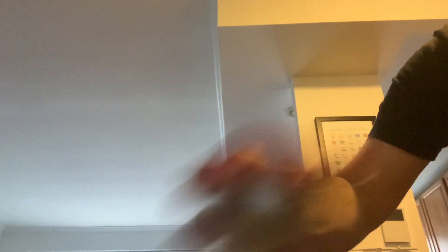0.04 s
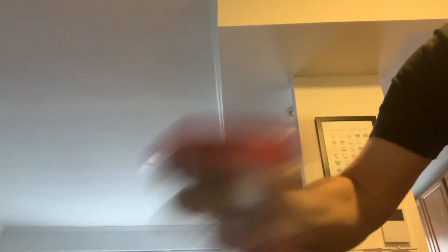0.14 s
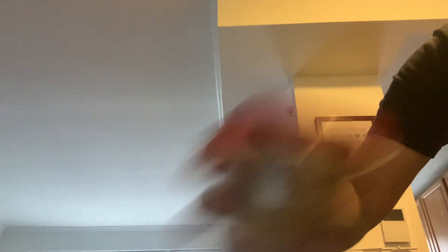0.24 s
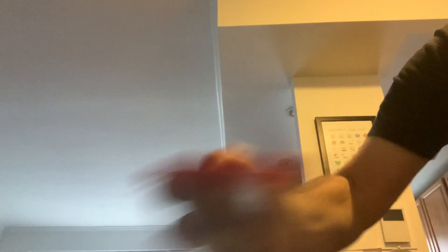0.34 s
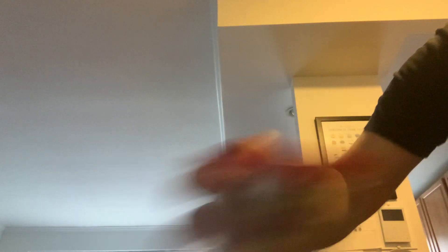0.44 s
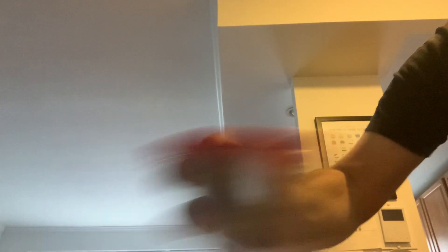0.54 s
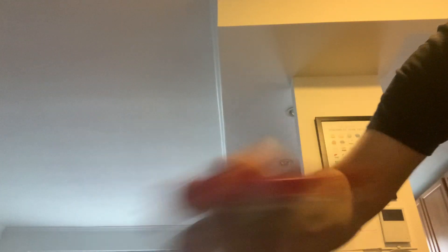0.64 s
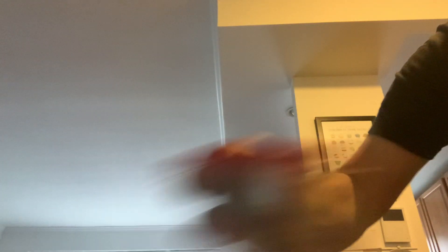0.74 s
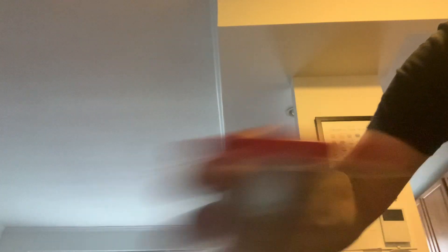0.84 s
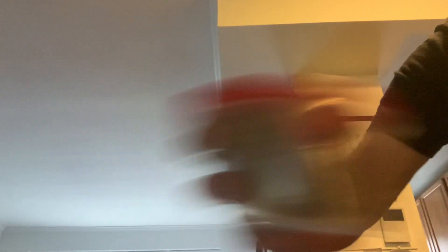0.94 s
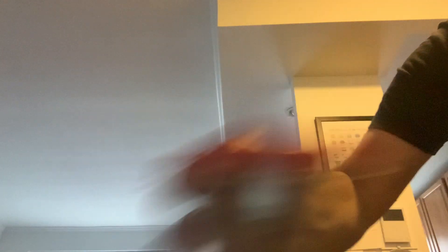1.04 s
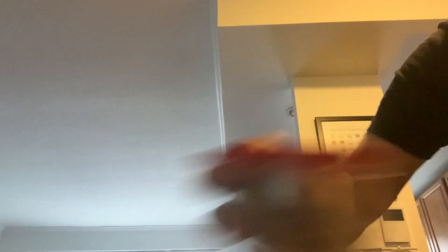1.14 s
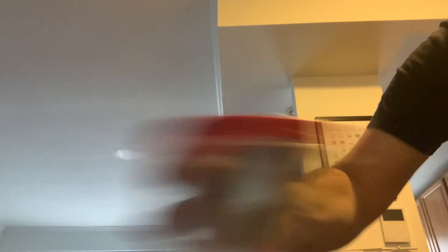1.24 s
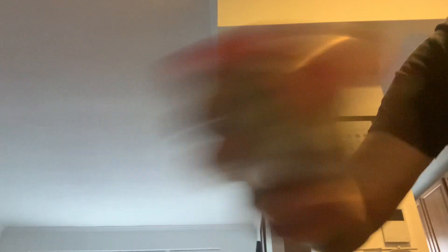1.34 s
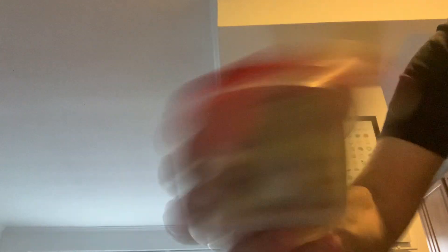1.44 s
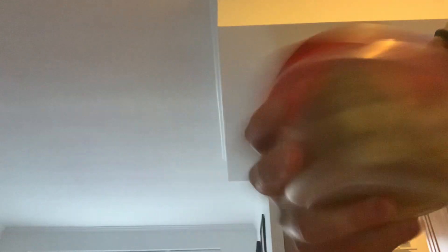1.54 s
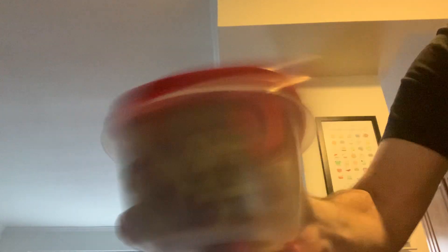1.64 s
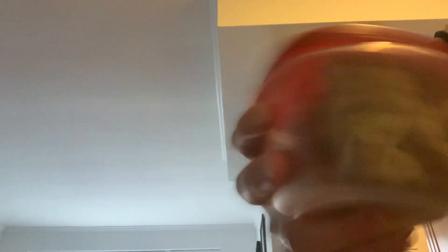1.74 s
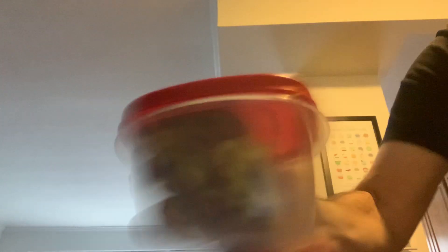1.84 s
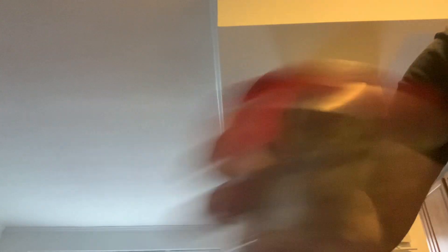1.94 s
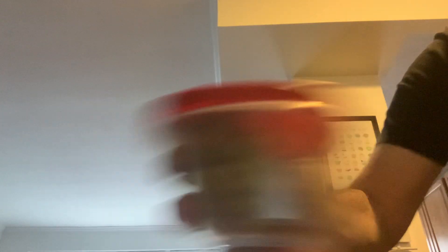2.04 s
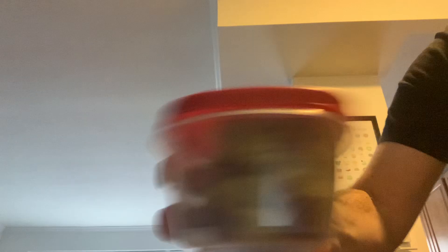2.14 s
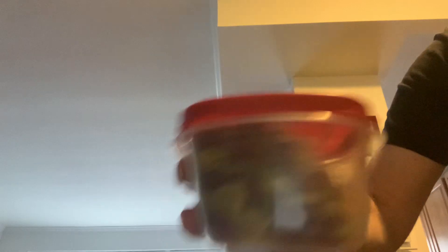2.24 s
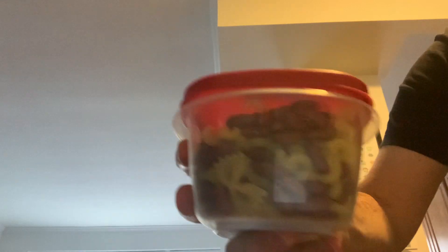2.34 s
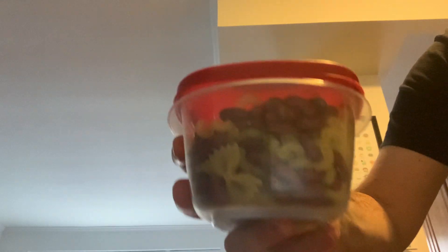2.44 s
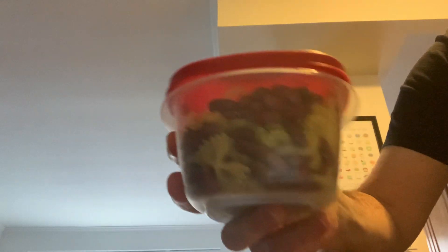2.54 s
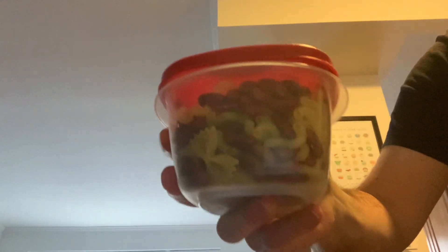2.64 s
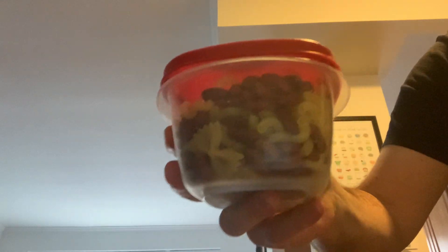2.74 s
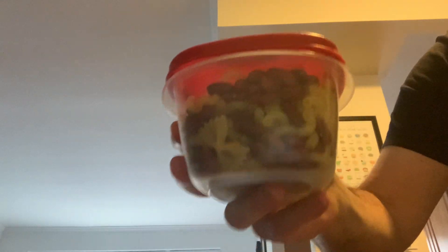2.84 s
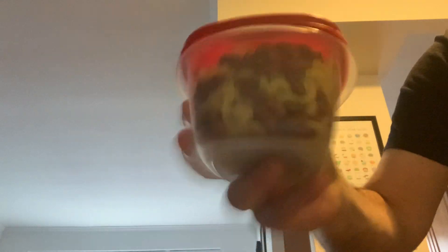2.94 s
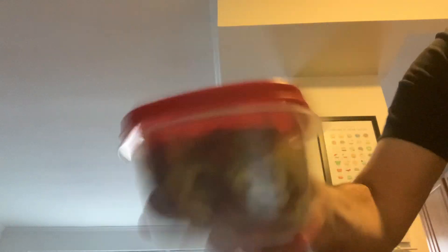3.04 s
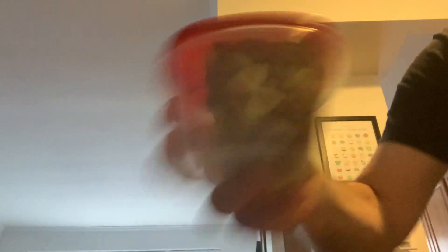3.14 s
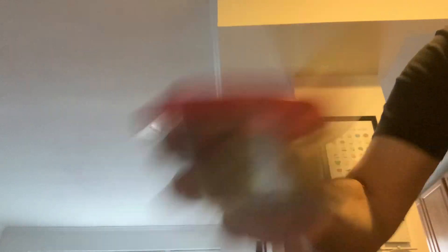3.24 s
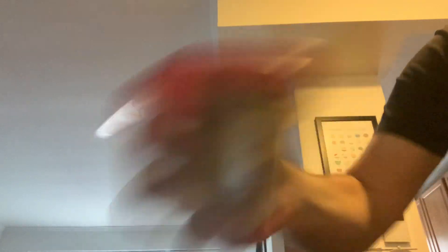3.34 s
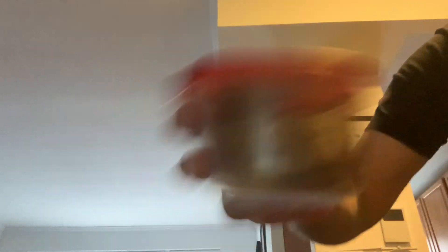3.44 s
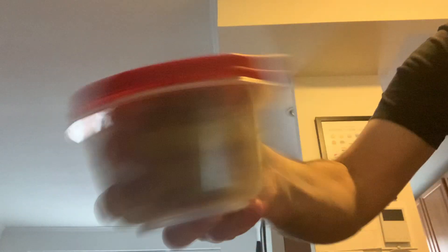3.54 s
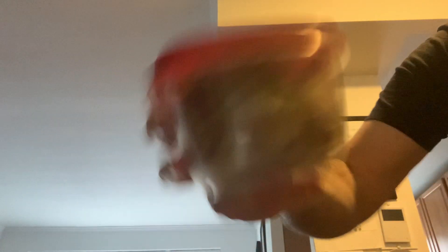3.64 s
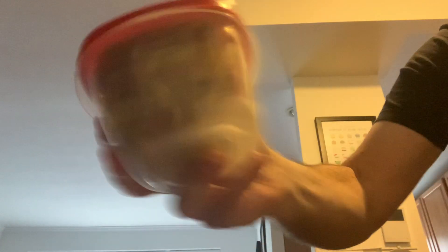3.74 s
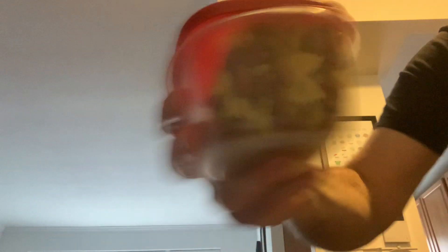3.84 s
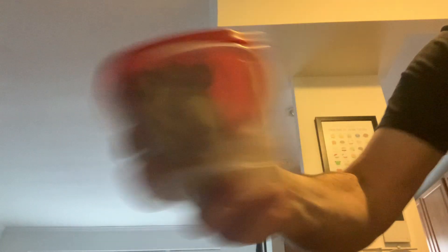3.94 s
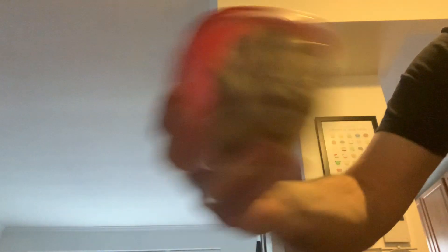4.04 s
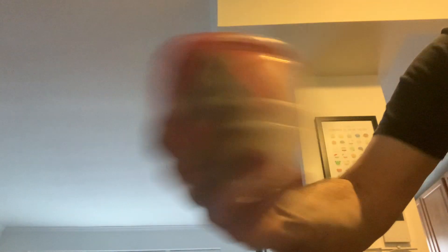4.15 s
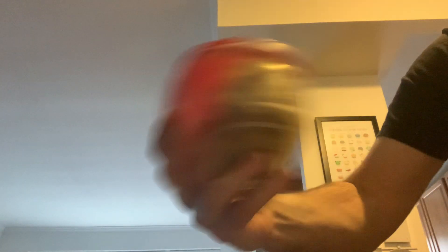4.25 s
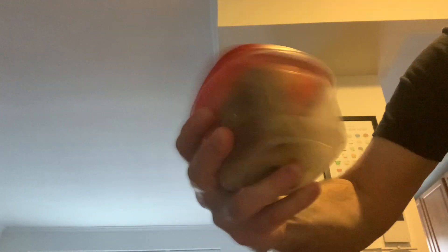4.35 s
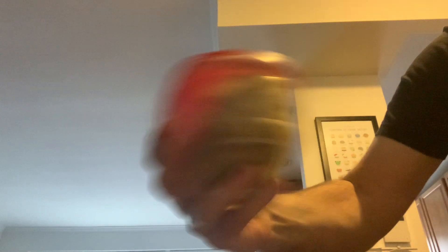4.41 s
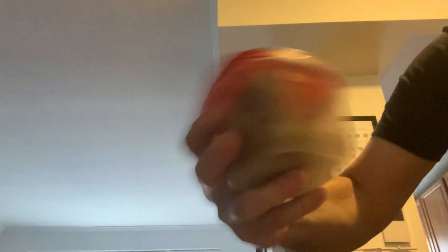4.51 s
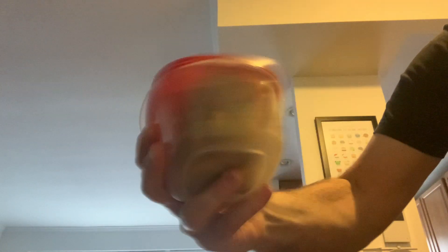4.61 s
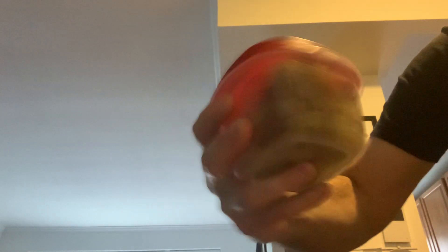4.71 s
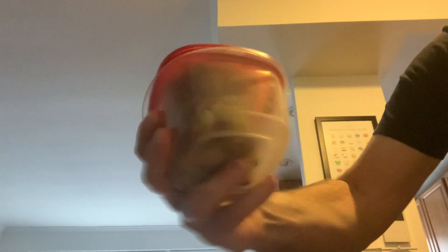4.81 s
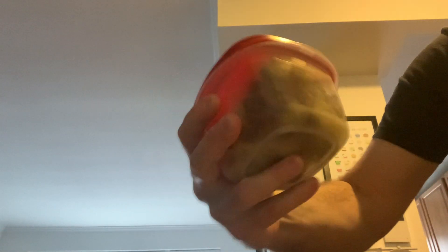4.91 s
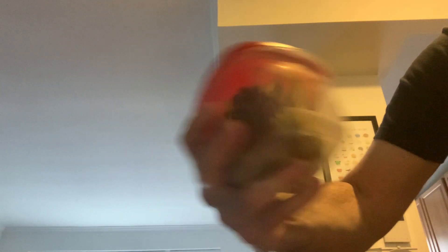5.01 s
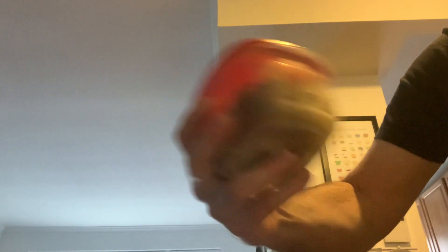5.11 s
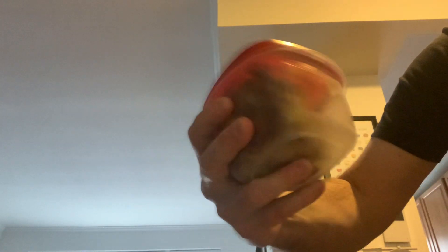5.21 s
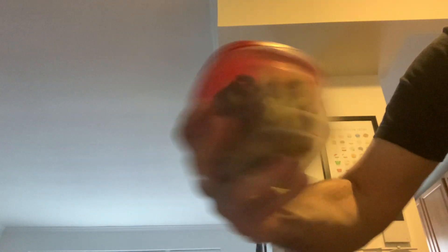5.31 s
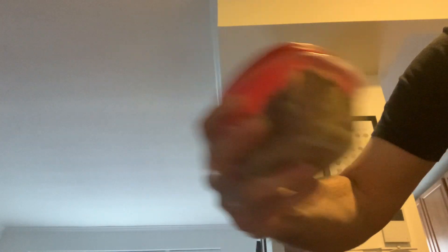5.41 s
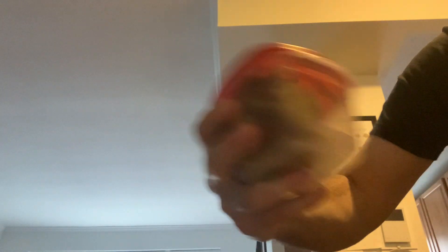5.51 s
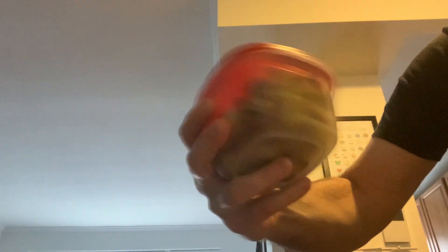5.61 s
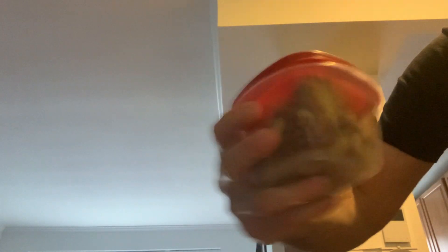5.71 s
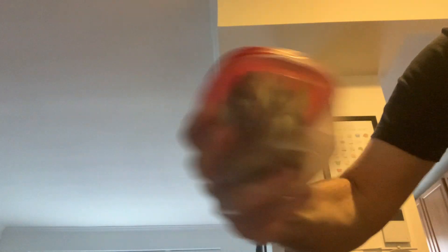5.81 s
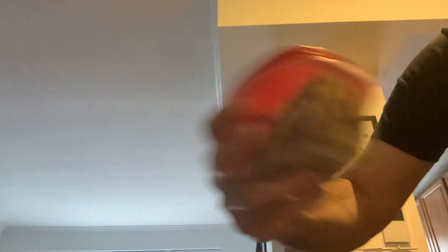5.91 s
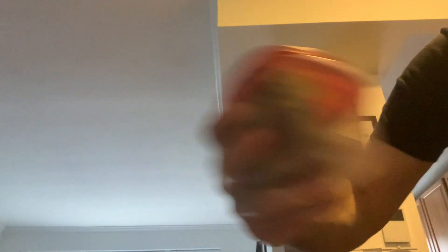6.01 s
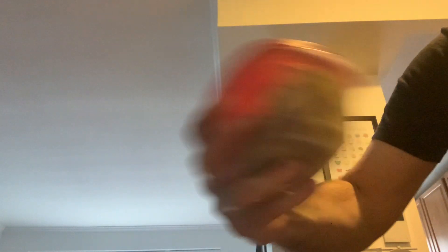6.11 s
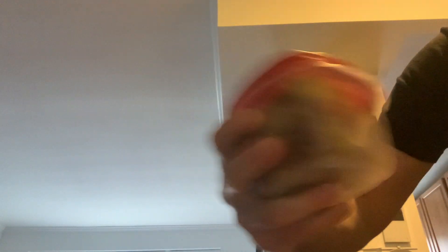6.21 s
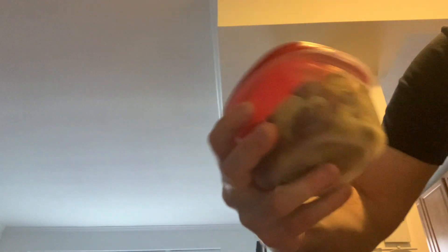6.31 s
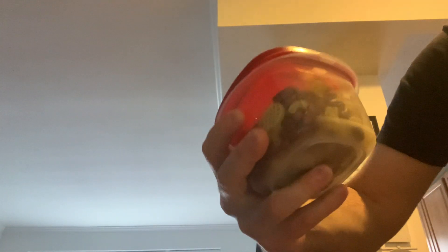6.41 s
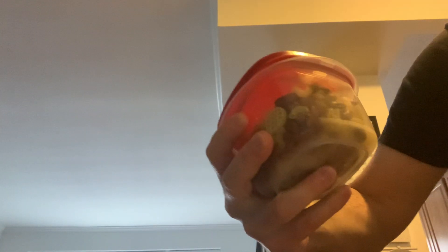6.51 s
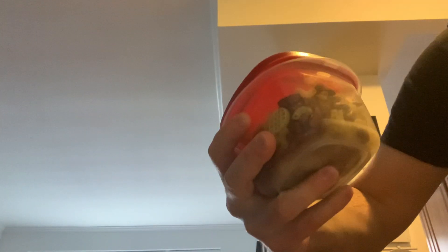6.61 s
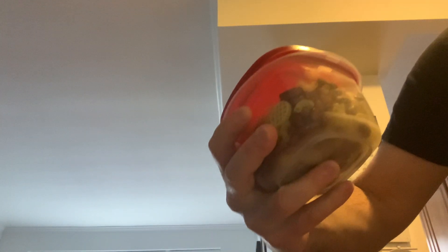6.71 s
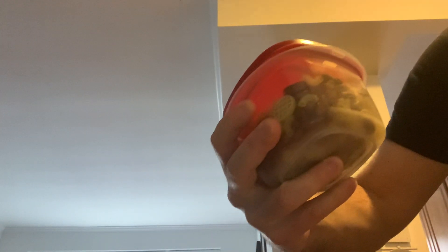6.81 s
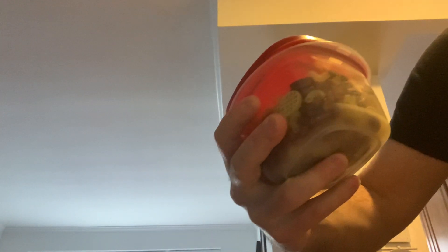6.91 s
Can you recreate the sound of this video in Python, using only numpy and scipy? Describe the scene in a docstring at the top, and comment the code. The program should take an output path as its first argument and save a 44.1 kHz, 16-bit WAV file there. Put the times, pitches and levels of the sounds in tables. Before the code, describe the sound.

Dry pasta and beans are shaken hard in a lidded plastic tub, close to the microphone in a small room. Each quick stroke makes a bright, crisp rattle with a hollow plastic thud beneath it. The shaking stops briefly while a few pieces settle, then resumes for a longer bout. At the end the last pieces tick into place over quiet room tone.

```python
"""Shaking a tub of dry pasta and beans

A lidded plastic tub is shaken hard in two bouts, close by in a small room, and turned onto its side
during the second. About eleven times a second the load crashes into one end: first a bright shower of
loose pieces, a moment later the packed bulk, which thuds on the plastic and sounds the tub's hollow note.
Between strokes the pieces tumble; after each bout the last ones settle and the hand shifts its grip."""
import sys
import numpy as np
from scipy import signal
from scipy.fft import rfft, irfft, next_fast_len
from scipy.io import wavfile
from scipy.ndimage import uniform_filter1d, map_coordinates

SR = 44100
rng = np.random.default_rng(int(sys.argv[2]) if len(sys.argv) > 2 else 0)


def log_audio(samples):
    """Write samples as a 16-bit WAV file to the path given in sys.argv[1]."""
    # one column per channel
    frames = np.atleast_2d(samples).T
    # limit to full scale, then quantise
    limited = np.clip(frames, -1, 1)
    pcm = np.round(limited * 32767).astype(np.int16)
    wavfile.write(sys.argv[1], SR, pcm)


N = 307199
TIME = np.arange(N) / SR

# The load hits an end of the tub, each layer on its own level scale:
# t/s, shower level/dB, rise to its crest/s, bulk lag after the crest/s, thud level/dB, note level/dB
STROKES = [(0.053, -17.5, 0.018, 0.0078, -30.5, -36), (0.15, -18.5, 0.036, 0.0093, -27, -29.5),
           (0.27, -15, 0.0045, 0.015, -27, -43), (0.37, -14.5, 0.014, 0.017, -25.5, -40.5),
           (0.473, -12, 0.015, 0.0054, -26, -33), (0.562, -17, 0.018, 0.012, -25.5, -26.5),
           (0.658, -16, 0.021, 0.01, -24, -48), (0.755, -14.5, 0.013, 0.013, -27.5, -27.5),
           (0.864, -14.5, 0.0033, 0.016, -27.5, -50), (0.946, -17, 0.03, 0.0034, -25.5, -29.5),
           (1.051, -16.5, 0.013, 0.015, -26, -42.5), (1.143, -17.0, 0.031, 0.0096, -25, -32.5),
           (1.253, -14, 0.015, 0.001, -25.5, -41), (1.349, -14.5, 0.013, 0.014, -29, -25),
           (1.439, -16, 0.021, 0.012, -25.5, -48), (1.531, -13.5, 0.012, 0.01, -45, -30),
           (1.626, -15, 0.0091, 0.012, -25.5, -37), (1.713, -13.5, 0.0095, 0.015, -33, -31.5),
           (1.81, -14, 0.0074, 0.012, -25, -41.5), (1.896, -12.5, 0.0075, 0.01, -33.5, -31.5),
           (1.984, -15.0, 0.013, 0.0047, -23.5, -42), (2.064, -15.5, 0.012, 0.011, -38, -28.5),
           (2.155, -17.5, 0.016, 0.005, -25.5, -34), (2.25, -17.5, 0.02, 0.001, -43, -34),
           (3.035, -21.5, 0.011, 0.0068, -20, -27.5), (3.089, -13, 0.012, 0.006, -30.5, -35),
           (3.195, -17, 0.0053, 0.008, -18.5, -49), (3.264, -15, 0.0077, 0.012, -46, -38),
           (3.355, -19.5, 0.029, 0.001, -22, -41), (3.443, -15.5, 0.01, 0.016, -38, -25.5),
           (3.523, -15.5, 0.018, 0.011, -24.5, -30), (3.625, -15.0, 0.014, 0.012, -33.5, -29.5),
           (3.713, -14.5, 0.015, 0.02, -29.5, -29), (3.804, -16.5, 0.023, 0.014, -31, -48),
           (3.887, -13.5, 0.016, 0.015, -40, -27.5), (3.986, -14.5, 0.0031, 0.013, -41.5, -32),
           (4.07, -15.5, 0.023, 0.0065, -30.5, -33), (4.173, -14.5, 0.0089, 0.0038, -44, -46.5),
           (4.256, -15.0, 0.021, 0.016, -45, -31.5), (4.351, -13.5, 0.011, 0.0022, -34, -51),
           (4.426, -16.5, 0.03, 0.0033, -40, -36), (4.514, -15.5, 0.017, 0.0065, -33.5, -50),
           (4.596, -14.5, 0.019, 0.013, -34, -29), (4.691, -13, 0.0063, 0.003, -41, -44),
           (4.778, -14, 0.014, 0.011, -37, -29), (4.873, -16, 0.011, 0.0075, -31, -44),
           (4.974, -19.5, 0.017, 0.012, -47, -43), (5.064, -23, 0.025, 0.001, -39, -37),
           (5.146, -21.5, 0.012, 0.001, -37, -52), (5.244, -24.5, 0.007, 0.001, -30.5, -40),
           (5.306, -16, 0.013, 0.014, -34, -62), (5.389, -21.5, 0.019, 0.002, -29, -35),
           (5.456, -17, 0.019, 0.0057, -38, -49), (5.54, -19.0, 0.032, 0.0018, -27.5, -31),
           (5.612, -16.5, 0.03, 0.01, -43, -51), (5.71, -18, 0.019, 0.001, -24.5, -34),
           (5.78, -15.5, 0.016, 0.014, -39, -30), (5.869, -16.5, 0.026, 0.001, -28.5, -53),
           (5.944, -16.0, 0.028, 0.013, -34, -27), (6.043, -15.5, 0.011, 0.011, -30.5, -47),
           (6.122, -16, 0.024, 0.0063, -33, -31.5), (6.223, -12.5, 0.0062, 0.008, -29, -40),
           (6.288, -20, 0.038, 0.011, -48, -44)]
# The turn of the tub: t/s, tilt (0 upright, 1 on its side)
TILT = [(0, 0), (3.6, 0), (4.3, 1)]


def amp(db):
    """Decibels to gain."""
    return 10 ** (np.asarray(db) / 20)


def unit(x):
    """Scaled to rms 1."""
    return x / np.sqrt(np.mean(x ** 2) + 1e-20)


def along(points, hz):
    """Rows of (f/Hz, value) read on a log frequency axis."""
    f, v = np.transpose(points)
    return np.interp(np.log(hz + 1), np.log(f), v)


def curve(rows):
    """One value per sample from rows of (t/s, value)."""
    return np.interp(TIME, *np.transpose(rows))


def coloured(x, spectrum, size=4096):
    """x through a minimum-phase filter of unit energy with the given colour."""
    cepstrum = irfft(np.log(amp(along(spectrum, np.fft.rfftfreq(size, 1 / SR)))))
    cepstrum[1:size // 2] *= 2
    cepstrum[size // 2 + 1:] = 0
    response = irfft(np.exp(rfft(cepstrum)))
    return signal.oaconvolve(x, response / np.linalg.norm(response))[:N]


def swell(crest, rise, fall):
    """The samples that a swell spans, and its bell-shaped envelope there."""
    span = slice(max(0, int((crest - 4 * rise) * SR)), int((crest + 4 * fall) * SR))
    t = TIME[span] - crest
    return span, np.exp(-.5 * (t / np.where(t < 0, rise, fall)) ** 2)


def swells(times, db, rise, fall):
    """Envelope of a series of swells, added in power."""
    power = np.zeros(N)
    for crest, peak, up, down in np.broadcast(times, amp(db), rise, fall):
        span, shape = swell(crest, up, down)
        power[span] += (peak * shape) ** 2
    return np.sqrt(power)


def contacts(rate, scatter_db):
    """Random impacts of uneven size, rate a second, with mean power 1."""
    chance = np.clip(rate / SR, 1e-4, 1)
    sizes = unit(amp(scatter_db * np.clip(rng.standard_normal(N), -2, 2)))
    return (rng.random(N) < chance) * rng.choice([-1, 1], N) * sizes / np.sqrt(chance)


def pieces(hits, t60, count=3, ring_size=512, block_size=2048):
    """Each impact is a sharp tick plus the brief ring of a piece; every block brings new pieces."""
    t = np.arange(ring_size) / SR
    blocks = np.pad(hits, (0, -N % block_size)).reshape(-1, 1, block_size)
    rings = rng.standard_normal((len(blocks), count, ring_size)) * amp(-60 * t / t60)
    rings[..., 0] = 0.82 * np.linalg.norm(rings, axis=2)  # the tick
    rings /= np.linalg.norm(rings, axis=2, keepdims=True)
    struck = rng.integers(count, size=blocks.shape) == np.arange(count)[:, None]  # one piece per hit
    rung = signal.fftconvolve(blocks * struck, rings, axes=2).sum(axis=1)
    positions = block_size * np.arange(len(rung))[:, None] + np.arange(rung.shape[1])
    return np.bincount(positions.ravel(), rung.ravel())[:N]  # overlap-add


def background(hum_hz, hum_db, air_db):
    """Room tone: quiet air and a low, wavering hum."""
    # Colour of the room air: f/Hz, level/dB
    air_colour = [(25, .5), (58, -3), (100, -4), (200, -2), (450, -3.5), (700, -20), (3000, -30),
                  (5400, -23.5), (9500, -19), (15500, -46)]
    waver = 0.014 * np.cumsum(rng.standard_normal(N))
    hum = amp(hum_db) * np.sin(2 * np.pi * hum_hz * TIME + waver)
    return hum + amp(air_db) * coloured(rng.standard_normal(N), air_colour)


def tumble():
    """Loose pieces slide and knock between strokes, hushed in flight, thinning as the tub comes to rest."""
    # Flow of loose pieces through both bouts: t/s, level/dB
    flow_levels = [(0, -26), (1.3, -29), (2.25, -28), (2.38, -33.5), (2.48, -50), (2.68, -79),
                   (3.005, -72.5), (3.035, -27.5), (3.9, -27.5), (5.1, -30), (6.35, -27), (6.41, -41.5),
                   (6.53, -42.5), (6.61, -56), (6.72, -54), (6.82, -64)]
    # Colour of sliding pieces: f/Hz, level/dB
    slide_colour = [(100, -34.5), (220, -16), (360, 0.9), (600, -6.5), (950, -10), (1350, -3.5), (2000, -5),
                    (2700, -1), (4400, -7), (6000, -7.5), (8500, -5.5), (10200, -5), (12500, -14.5),
                    (15800, -34)]
    onsets, *_ = np.transpose(STROKES)
    airborne = swells(onsets - .014, db=0, rise=.013, fall=.013)  # just before each landing
    flow = amp(curve(flow_levels) - 3 * airborne)
    hits = flow * contacts(600 + 130000 * flow, scatter_db=3.0)
    slide = coloured(pieces(hits, t60=.01), slide_colour)
    # slow pieces touch softly and sound duller
    soft = signal.sosfiltfilt(signal.butter(1, 4500, fs=SR, output="sos"), slide)
    hardness = flow / (flow + amp(-66))
    return soft + hardness * (slide - soft)


def showers(early_db=-3, front_s=0.002, fall_s=0.0093):
    """Envelope of the showers: a few early pieces, a sudden front, then a rise to the crest."""
    power = np.zeros(N)
    for onset, db, rise, *_ in STROKES:
        span, shape = swell(onset + rise, rise, fall_s)
        ahead = .5 - .5 * np.tanh((TIME[span] - onset) / front_s)
        power[span] += (amp(db + early_db * ahead) * shape) ** 2
    return np.sqrt(power)


def clumps(rate, depth_db):
    """Pieces arrive in clumps: a quick random gain of mean power 1, rate knots a second."""
    knots = rng.standard_normal(int(N * rate / SR) + 4)
    return unit(amp(depth_db * map_coordinates(knots, [TIME * rate], order=1)))


def wall_patches(x, depth_db, size=256):
    """The load lands on a new part of the wall each time, so broad resonances come and go."""
    spectra = signal.stft(x, nperseg=size)[2]
    patches = uniform_filter1d(rng.standard_normal(spectra.shape), size=7, axis=0)  # across frequency
    patches = uniform_filter1d(patches, size=16, axis=1)  # across time
    return signal.istft(spectra * unit(amp(depth_db * unit(patches))), nperseg=size)[1][:N]


def clatter(shower_treble_db=-1, bulk_treble_db=-0.1, sideways_treble_db=-0.05):
    """Two waves of contacts a stroke, denser when strong: a shower on the bare wall, then the bulk."""
    # Colour of pieces showering on the wall: f/Hz, level/dB
    clatter_colour = [(40, -67.5), (100, -50), (300, -21.5), (950, -12.5), (1350, -13), (2000, -9),
                      (2700, -1.5), (3400, -3), (4400, -7.5), (5000, -5.5), (5600, -7.5), (7400, -3),
                      (9000, -2.5), (10000, 2), (11300, -1.5), (12500, -9), (15800, -18.5)]
    onsets, shower_db, rise, lag, _, _ = np.transpose(STROKES)
    shower = showers()
    bulk = swells(onsets + rise + lag, shower_db - 5, rise=.0014, fall=.019)
    force = np.hypot(shower, bulk) * clumps(rate=260, depth_db=2)
    hits = force * contacts(1500 + 22000 * force, scatter_db=5.0)
    rattle = wall_patches(coloured(pieces(hits, t60=0.0079), clatter_colour), depth_db=0.5)
    bare = shower / (shower + bulk + 1e-9)
    treble_db = bare * shower_treble_db + (1 - bare) * bulk_treble_db + curve(TILT) * sideways_treble_db
    dull = signal.sosfiltfilt(signal.butter(2, 5500, fs=SR, output="sos"), rattle)
    return amp(0.57) * (dull + amp(treble_db) * (rattle - dull))


def base_ring(x):
    """Pieces landing on the stiff base add a hard ring, which fades as the tub is turned."""
    # Resonances of the base: f/Hz, width/Hz, level/dB
    modes = [(1530, 1200, -11.5), (4180, 890, -8.5)]
    ring = sum(amp(db) * signal.lfilter(*signal.iirpeak(hz, hz / width, fs=SR), x)
               for hz, width, db in modes)
    return x + (1 - curve(TILT)) * ring


def thuds():
    """The bulk of the load follows the shower and knocks on the plastic."""
    # Colour of the bulk hitting lid or base: f/Hz, level/dB
    thud_colour = [(25, -50.5), (60, -41.5), (120, -16.5), (210, -10.5), (330, 1.5), (520, 0), (740, 3.5),
                   (920, -7.5), (1350, -1.6), (1800, -5), (2600, -7.5), (5000, -11), (15000, -49)]
    onsets, _, rise, lag, thud_db, _ = np.transpose(STROKES)
    push = swells(onsets + rise + lag, thud_db + 1.1, rise=0.01, fall=0.013)
    hits = push * contacts(4000, scatter_db=3.5)
    return wall_patches(coloured(hits, thud_colour), depth_db=2.0)


def hollow_note(upright_hz=412.4, sideways_hz=382, spread_hz=20, delay_s=.006, palm_db=-1):
    """The landing bulk flexes the wall with a thump and sounds the air in the tub."""
    # Colour of the flexing wall: f/Hz, level/dB
    thump_colour = [(50, -27.5), (110, -18.5), (210, -2), (300, .5), (400, 5.5), (520, 4.5), (620, -6.5),
                    (740, 1.5), (900, -19.5), (2000, -32.5), (10000, -64)]
    onsets, _, rise, lag, _, note_db = np.transpose(STROKES)
    landings = onsets + rise + lag + delay_s
    tilt = np.interp(onsets, *np.transpose(TILT))
    # the pitch varies with where the load lies
    pitches = upright_hz + tilt * (sideways_hz - upright_hz) + spread_hz * rng.standard_normal(len(onsets))
    note_db = note_db + tilt * palm_db  # on its side, the tub is damped by the palm
    drift = 0.02424 * np.cumsum(rng.standard_normal(N))
    note = np.zeros(N)
    for landing, db, hz in zip(landings, note_db, pitches):
        span, shape = swell(landing, rise=0.0032, fall=0.014)
        note[span] += amp(db + 4) * shape * np.sin(2 * np.pi * hz * TIME[span] + drift[span])
    flex = swells(landings, note_db - 4, rise=0.0039, fall=0.012)
    return note + coloured(flex * contacts(3000, scatter_db=1.5), thump_colour)


def room_reverb(x):
    """The walls answer after a few milliseconds; the highest treble dies first."""
    # Decay of the room: f/Hz, t60/s
    decay_times = [(150, 0.24), (500, 0.56), (3000, 0.4), (10000, 0.46), (16000, .06)]
    hz, t, spectra = signal.stft(rng.standard_normal(SR // 2), SR, nperseg=256)
    decay = amp(-60 * t / along(decay_times, hz)[:, None])
    tail = signal.istft(spectra * decay, SR, nperseg=256)[1]
    tail = np.pad(tail, (SR // 300, 0))  # pre-delay
    return signal.oaconvolve(x, tail / np.linalg.norm(tail))[:N]


def standing_waves(x):
    """Low standing waves of the room ring on after the thuds."""
    # Room modes: f/Hz, width/Hz, level/dB
    modes = [(123, 3, 4.5), (209, 5.7, 4.5)]
    size = next_fast_len(N + SR)
    f = np.fft.rfftfreq(size, 1 / SR)
    response = sum(amp(db) * 1j * f * width / (hz * hz - f * f + 1j * f * width) for hz, width, db in modes)
    return irfft(rfft(x, size) * response, size)[:N]


def stray_pieces():
    """Stray pieces land one by one: a tick on other pieces, a duller knock on the wall."""
    # Single landings: t/s, relative tick level/dB, knock level against the tick/dB
    landings = [(2.338, -17.5, -7), (2.377, -23, 6.5), (2.429, -16.5, -17), (2.446, -24, -10),
                (2.483, -30.5, 1), (2.494, -25, -8), (2.529, -31, -3), (2.550, -23.5, -2),
                (2.565, -32.5, -1), (2.605, -44, 2), (2.723, -33.5, -6), (5.055, -4, -16), (5.117, -8, -25),
                (5.229, -7, -18), (6.372, -21, 4.5), (6.444, -23, -18), (6.472, -20, -12), (6.505, -18, -9),
                (6.537, -31, -4), (6.573, -33, -3), (6.633, -43, 6), (6.652, -24.5, -16), (6.660, -15, -17),
                (6.682, -26, -17.5), (6.703, -18.5, -14), (6.711, -26, -14), (6.730, -26, -25),
                (6.777, -31, -23), (6.861, -35.5, -21), (6.885, -49.5, 8)]
    # Colour of one piece on other pieces: f/Hz, level/dB
    tick_colour = [(150, -21), (600, -17.5), (1500, -23.5), (3000, -2), (5000, 1.5), (7000, 3.5),
                   (11300, 7), (13000, -9), (15800, -16)]
    # Colour of one piece on the wall: f/Hz, level/dB
    knock_colour = [(150, -36), (500, -9), (1400, -2), (2600, 3), (4000, -1), (7000, -22), (15000, -46)]
    tick_hits, knock_hits = np.zeros(N), np.zeros(N)
    for t, db, knock_db in landings:
        tick_hits[round(t * SR)] = amp(db)
        knock_hits[round(t * SR)] = amp(db + knock_db)
    ticks = coloured(pieces(tick_hits, t60=0.0085), tick_colour)
    knocks = coloured(pieces(knock_hits, t60=0.0094), knock_colour)
    return amp(7.0) * ticks + amp(10.0) * knocks


def grip():
    """A soft, dull rubbing of the hand on the plastic."""
    # The hand shifts on the resting tub: t/s, level/dB, rise/s, fall/s
    shifts = [(2.72, -59.5, .07, .08), (6.55, -70, .15, 0.34)]
    # Colour of skin on plastic: f/Hz, level/dB
    rub_colour = [(60, -28), (200, -7.5), (400, -3), (600, -15), (1500, -21.5), (5000, -34)]
    return swells(*np.transpose(shifts)) * coloured(rng.standard_normal(N), rub_colour)


def scene():
    """The shaken tub in its room."""
    tub = amp(0.1) * base_ring(clatter() + tumble()) + thuds() + hollow_note() + stray_pieces() + grip()
    walls = amp(-16) * room_reverb(tub) + amp(-1) * standing_waves(tub)
    return (tub + walls + background(hum_hz=129, hum_db=-70.0, air_db=-67.5))[None]


def record(dry):
    """The microphone drops the deep bass, rounds off the tallest peaks and cuts the extreme treble."""
    low_hz, top_hz, ceiling = 48, 15900, amp(-3)
    thin = signal.sosfilt(signal.butter(4, low_hz, "high", fs=SR, output="sos"), dry)
    rounded = thin / (1 + (thin / ceiling) ** 4) ** (1 / 4)
    size = next_fast_len(N + SR // 2)
    band = np.clip((top_hz - np.fft.rfftfreq(size, 1 / SR)) / 400 + .5, 0, 1) ** 2
    return irfft(rfft(rounded, size) * band, size)[..., :N]


dry = scene()
out = record(dry)
log_audio(out)
```